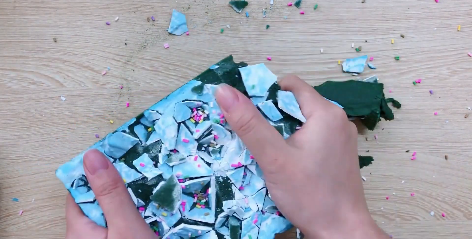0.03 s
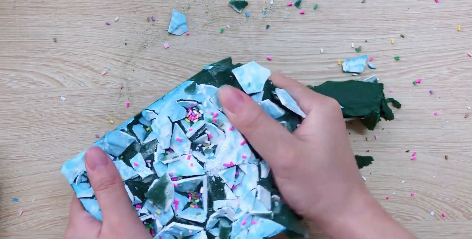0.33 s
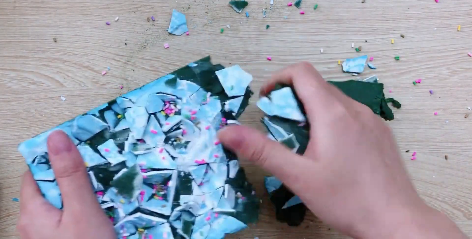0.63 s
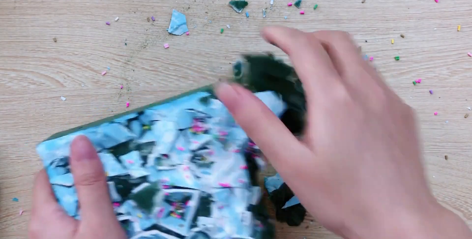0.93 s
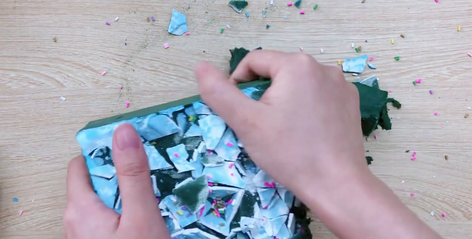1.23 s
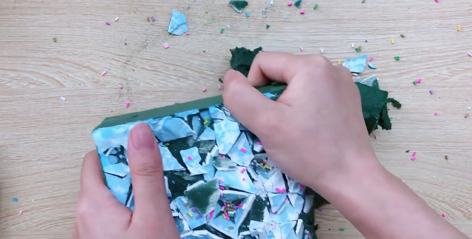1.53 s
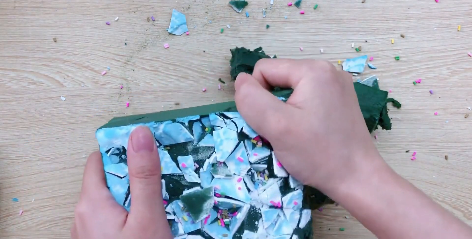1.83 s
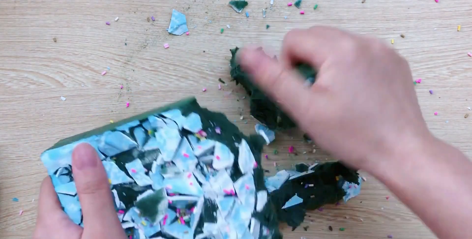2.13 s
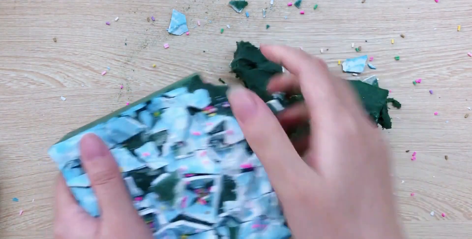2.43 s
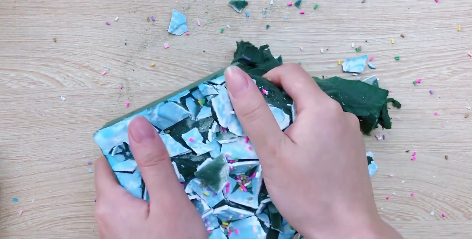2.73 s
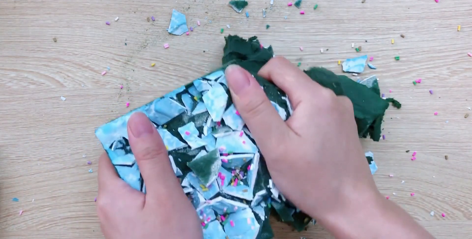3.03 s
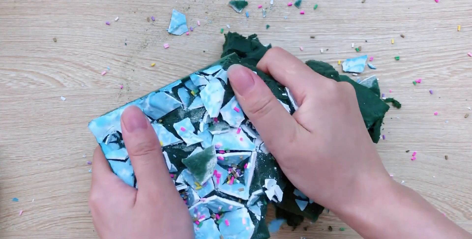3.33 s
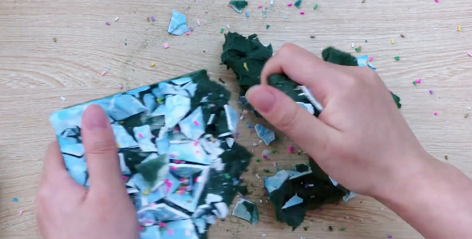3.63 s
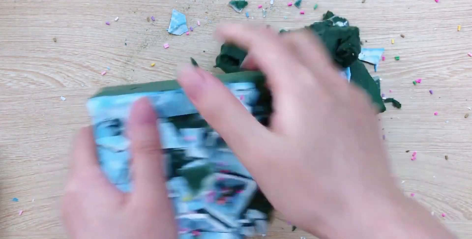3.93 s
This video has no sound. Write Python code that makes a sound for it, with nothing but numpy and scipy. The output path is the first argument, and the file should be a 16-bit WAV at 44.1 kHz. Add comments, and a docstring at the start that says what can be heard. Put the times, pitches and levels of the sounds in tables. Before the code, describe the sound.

Dry plaster-coated foam crunches and snaps up close as fingers tear it during the first 0.7 seconds. Shards and crumbs tap a wooden table around 1 second. A longer crackling squeeze runs from 1.2 to 1.8 seconds, followed by lighter crunches, pops and taps. Strong crunching and snapping returns from 2.7 to 3.7 seconds, then more bits fall. Soft handling rumble and a faint low hum lie underneath.

```python
"""Tearing plaster-coated foam

Close to the microphone, over a wooden table in a small room, fingers squeeze and tear chunks off a dry
block. Thousands of tiny cells collapse in each squeeze, the block gives way with dull pops and its
plaster crust snaps. Shards and crumbs tap on the table, over handling rumble and a low hum."""
import sys
import numpy as np
from scipy import signal
from scipy.fft import rfft, irfft
from scipy.io import wavfile
from scipy.ndimage import uniform_filter1d, map_coordinates

SR = 44100
rng = np.random.default_rng(int(sys.argv[2]) if len(sys.argv) > 2 else 0)


def unload_wav(signal):
    """Save mono or channel-first audio to the path in sys.argv[1] as 16-bit WAV at rate SR, clipped to [-1, 1]."""
    wavfile.write(
        sys.argv[1],
        SR,
        np.round(np.clip(np.atleast_2d(signal).T, -1, 1) * 32767).astype(np.int16),
    )


N = 176400
T = np.arange(N) / SR
MS, HIT_SAMPLES = SR / 1000, 2048  # samples in a millisecond and in one hit
HIT_MS = np.arange(HIT_SAMPLES) / MS
CELLS_PER_S, CELL_SPREAD_DB = 9000, 2.5
LEAD_DB = -18.5  # the strain before a snap or pop, relative to it

# Fingers squeeze the foam. Each row: time in seconds, relative levels of fizz and of crunch in dB.
SQUEEZES = [(0, -33, -34.5), (0.08, -25, -28.5), (0.2, -24.5, -29.5), (0.31, -24.5, -34),
            (0.425, -34.5, -48), (0.478, -24.5, -28.5), (0.53, -34, -42.5), (0.59, -38.5, -45),
            (0.68, -29.5, -36), (0.7, -45.5, -43.5), (0.81, -49, -48), (0.9, -37.5, -46),
            (1.05, -50, -45.5), (1.19, -55, -57), (1.205, -33, -35.5), (1.24, -45, -30.5), (1.28, -43, -38),
            (1.31, -32, -33.5), (1.39, -31.5, -39), (1.44, -26, -34), (1.52, -22, -37.5), (1.6, -26, -39.5),
            (1.66, -33, -42.5), (1.76, -33, -44.5), (1.805, -22.5, -33.5), (1.87, -48, -44.5),
            (1.96, -36.5, -45.5), (2.02, -40, -49.5), (2.085, -27.5, -37), (2.135, -46, -50),
            (2.18, -32, -47), (2.24, -49, -51.5), (2.35, -31.5, -41), (2.42, -36.5, -41), (2.48, -55, -55),
            (2.54, -48, -45.5), (2.635, -62, -50), (2.658, -38, -31.5), (2.69, -48, -41.5),
            (2.75, -36, -31.5), (2.89, -24, -31.5), (2.96, -31, -32.5), (3.015, -37.5, -38),
            (3.07, -28, -37.5), (3.2, -32.5, -40.5), (3.3, -46.5, -50), (3.345, -23.5, -37),
            (3.41, -34.5, -47.5), (3.47, -31, -43.5), (3.525, -49.5, -55.5), (3.57, -28.5, -34),
            (3.605, -31, -44), (3.64, -26, -36), (3.7, -45.5, -45.5), (3.78, -36, -44), (4.0, -44, -45)]
# The tone of surface fizz, grit, hollow crunch, handling rumble and room air.
# Each row: frequency in Hz, relative level in dB.
FIZZ_SPECTRUM = [(1500, -44), (2800, -42), (4200, -1.5), (6000, -2.5), (8000, 1.5), (10500, 0.5),
                 (13000, -4.5), (15500, -12.5)]
GRIT_SPECTRUM = [(800, -25), (1500, -4.5), (2100, -3), (3200, 10), (4200, 7.5), (6500, 4.5), (12000, -28)]
CRUNCH_SPECTRUM = [(120, -17.5), (400, -13.5), (620, -5.5), (1100, -0.5), (1750, 0), (2500, -4.5),
                   (4500, -17.5)]
RUMBLE_SPECTRUM = [(20, -15), (45, -1.5), (135, 8), (180, 0), (270, 3.5), (450, -2), (3000, -29)]
AIR_SPECTRUM = [(60, 12.5), (1000, 13), (15000, -68)]
# A low hum swells and sinks. Each row: time in seconds, level in dB that it wavers around.
HUM_LEVELS = [(0, -53.5), (1.25, -52), (1.42, -38.5), (1.66, -39.5), (1.88, -55.5), (2.12, -47),
              (2.53, -47), (4, -56)]
# Hands shift the block. Each row: time in seconds, relative level of the rumble in dB.
HANDLING_LEVELS = [(0, -43.5), (.44, -55.5), (.5, -43), (.9, -49.5), (.98, -39.5), (1.07, -44.5),
                   (1.13, -42.5), (1.27, -40.5), (1.95, -52.5), (2.45, -41), (3.05, -48.5), (3.75, -51),
                   (3.92, -42.5), (4, -45)]
# The block gives way or bumps the table. Each row: start in seconds, level in dB, pitch in Hz.
BLOCK_POPS = [(.0083, -9, 1250), (0.017, -17.5, 1280), (0.489, -7.5, 1075), (.604, -19.5, 860),
              (1.111, -12, 1100), (1.111, -16.5, 315), (1.2232, -12, 990), (2.2025, -24, 1540),
              (2.424, -14.5, 1060), (2.659, -19, 1270), (2.686, -26, 1700), (3.633, -23.5, 416)]
# The crust snaps. Each row: start in seconds, level in dB, centre of the crack in Hz,
# decay in milliseconds, level of the block's knock in dB.
CRUST_SNAPS = [(0.2025, -8.5, 4260, 0.81, -39), (0.2887, -14.5, 6500, 1.3, -14.5),
               (0.3374, -11.5, 8000, 2.1, -9), (0.342, -3.5, 6640, 2.7, -15),
               (0.3617, -8, 6800, 0.52, -18.5), (0.3854, -6.5, 4400, 1.6, -14.5),
               (1.022, -18.5, 4340, 2.8, -26), (1.1114, -19.5, 5250, 3.1, -31),
               (1.4098, -4.5, 8440, 9.6, -22), (1.4548, -8, 5140, 0.66, -12.5),
               (1.5006, -10.5, 4480, 1.3, -11), (1.6203, -12.5, 8850, 1.6, -24.5),
               (1.7066, -15, 6030, 1.5, -30), (1.7833, -3.5, 5330, 1.8, -11.5), (1.79, -10, 6000, 5.3, -16),
               (2.385, -12.5, 3850, 1.1, -38), (2.5032, -9, 2720, 0.68, -31),
               (2.5117, -7.5, 3500, 0.32, -21), (2.923, -11, 6800, 2.1, -30),
               (2.9325, -3.5, 3960, 0.91, -16.5), (3.1200, -14, 5960, 0.58, -22),
               (3.172, -16.5, 7000, 0.81, -25.5), (3.3540, -14, 7000, 2.2, -23.5),
               (3.3570, -5.5, 4940, 0.83, -17.5), (3.5505, -14.5, 3600, 0.37, -28),
               (3.6318, -2, 5500, 2.7, -13), (3.852, -19, 6800, 1.2, -28)]
# A chunk rips free. Each row: peak time in seconds, half-width in seconds, level in dB.
CHUNK_RIPS = [(0.457, 0.0027, -14), (.975, 0.0043, -25.5), (2.113, 0.0024, -27), (3.566, 0.0052, -17),
              (3.9, 0.0083, -27.5)]
# Shards land on the table. Each row: start in seconds, level in dB, pitch in Hz.
SHARD_TAPS = [(0.6706, -16.5, 2200), (.868, -20.5, 2130), (0.9356, -8, 2080), (0.94, -9.5, 2180),
              (1.0134, -20, 2130), (1.0225, -18, 2090), (1.0284, -22, 2180), (1.2231, -7, 2120),
              (1.3594, -13.5, 2510), (1.9233, -19.5, 2420), (2.2162, -22, 5070), (2.547, -19, 2130),
              (3.8518, -14.5, 2150), (3.8997, -13, 2150), (3.937, -25, 2150), (3.978, -23.5, 2150)]
# The short ring of a tap on the table.
# Each row: ratio to the tap's pitch, relative level in dB, decay in milliseconds.
TAP_RING = [(1, 32.5, 1.03), (1.03, -1, 11), (1.24, 16.5, 1.9)]
# Crumbs trickle on to the table. Each row: start in seconds, end in seconds, level in dB.
CRUMB_TRICKLES = [(0.943, 1.145, -41), (2.39, 2.554, -36.5), (3.85, 3.997, -36.5)]
# Hard squeezes make the block groan.
# Each row: peak time in seconds, half-width in seconds, level in dB, resonance in Hz.
BLOCK_GROANS = [(1.514, 0.096, -30.5, 1130), (2.863, 0.043, -29, 1000), (2.866, 0.04, -31, 1690)]


def amp(db):
    """Decibels to gain."""
    return 10 ** (np.asarray(db) / 20)


def unit(x):
    """Scale to rms 1."""
    return x / np.sqrt(np.mean(x ** 2))


def blow(x, db):
    """Give a short sound the energy of one millisecond at this level."""
    return x * amp(db) * np.sqrt(MS / np.sum(x ** 2))


def curve(rows, column=1):
    """Gain over time from a dB column of a table."""
    rows = np.array(rows)
    return amp(np.interp(T, rows[:, 0], rows[:, column]))


def swell(peak_s, half_width_s, db):
    """A brief rise and fall of level."""
    return amp(db) * np.exp(-2 * ((T - peak_s) / half_width_s) ** 2)


def colour(x, spectrum):
    """Causal filter with the given (Hz, dB) shape; output at rms 1."""
    hz, db = np.array(spectrum).T
    shape_db = np.interp(np.log(np.fft.rfftfreq(N, 1 / SR) + 1), np.log(hz), db)
    cepstrum = irfft(np.log(amp(shape_db)), N)
    cepstrum[1:N // 2] *= 2  # minimum phase: nothing rings ahead of a click
    cepstrum[N // 2 + 1:] = 0
    return unit(irfft(rfft(x) * np.exp(rfft(cepstrum)), N))


def wander(rate_hz):
    """Smooth random drift at rms 1."""
    hold = max(int(SR / rate_hz), 1)
    steps = np.repeat(rng.standard_normal(N // hold + 1), hold)
    return unit(uniform_filter1d(steps, hold)[:N])


def clicks(per_s, spread_db):
    """Random clicks: many small ones and a few large."""
    fires = rng.random(N) < per_s / SR
    size = np.minimum(rng.exponential(size=N), 6)
    return fires * rng.choice([-1, 1], N) * amp(spread_db * size)


def ring(hz, decay_ms, rise_ms=0.19):
    """The velocity of one damped mode, set off by a soft contact."""
    envelope = np.exp(-HIT_MS / decay_ms) * (1 - np.exp(-HIT_MS / rise_ms))
    swing = np.sin(2 * np.pi * hz * HIT_MS / 1000) * envelope
    return np.diff(swing, prepend=0) * SR / (2 * np.pi * hz)


def resonate(x, hz, decay_ms):
    """Pass a sound through one mode; output at rms 1."""
    return unit(signal.fftconvolve(x, ring(hz, decay_ms))[:N])


def fracture(hz, octaves, decay_ms, top_hz=11200):
    """A running crack: a fast-dying rattle of micro-fractures in a broad band."""
    f = np.fft.rfftfreq(HIT_SAMPLES, 1 / SR) + 1
    band = np.exp(-.5 * (np.log2(f / hz) / octaves) ** 2) / np.sqrt(1 + (f / top_hz) ** 8)
    rattle = irfft(band * np.exp(2j * np.pi * rng.random(len(f))))
    attack = 1 - np.exp(-HIT_MS / 1000 * hz)
    return rattle * attack * np.exp(-HIT_MS / decay_ms)


def add(out, start_s, x):
    """Mix a short sound in at its start time."""
    i = int(start_s * SR)
    x, i = x[max(-i, 0):], max(i, 0)
    out[i:i + len(x)] += x[:max(N - i, 0)]


def foam():
    """Cells collapse in uneven avalanches: fizz at the surface, hollow crunch inside, grit between."""
    bright, hollow = curve(SQUEEZES, column=1), curve(SQUEEZES, column=2)
    walls = amp(-10.5) * unit(clicks(per_s=350, spread_db=5))  # coarser clicks common to all layers
    cells = lambda: unit(clicks(CELLS_PER_S, CELL_SPREAD_DB)) + walls
    fizz = amp(-2) * bright * colour(cells(), FIZZ_SPECTRUM)
    grit = amp(-1.5 + 2 * wander(24.5)) * np.sqrt(bright * hollow) * colour(cells(), GRIT_SPECTRUM)
    crunch = amp(1.5) * hollow * colour(cells(), CRUNCH_SPECTRUM)
    groans = sum(swell(s, half_width_s, db) * resonate(cells(), hz, decay_ms=0.88)
                 for s, half_width_s, db, hz in BLOCK_GROANS)
    fingertip_scrape = swell(2.088, 0.04, db=-32) * resonate(cells(), hz=3150, decay_ms=0.19)
    flutter = amp(2.16 * wander(160))
    return (fizz + grit + crunch + groans + fingertip_scrape) * flutter


def near_reflections(x):
    """Table and hands bounce the sound to the microphone; the paths shift as the block moves."""
    echoes, power = np.zeros(N), 1
    for delay_ms, db in [(0.848, -14.5), (2.598, -24.5)]:
        lag = delay_ms * MS * (1 + 0.1 * wander(5.5))
        echoes += amp(db) * map_coordinates(x, [np.arange(N) - lag], order=3)
        power += amp(db) ** 2
    return (x + echoes) / np.sqrt(power)


def hum(hz=64.7):
    """A low hum in the background, wavering in pitch and level, with a faint octave."""
    phase = 2 * np.pi * np.cumsum(hz * (1 + 0.036 * wander(8.2))) / SR
    fundamental = curve(HUM_LEVELS) * amp(3.5 * wander(8.1)) * np.sin(phase)
    octave = amp(-59.5 + wander(26)) * np.sin(2 * phase)
    return np.sqrt(2) * (fundamental + octave)


def handling():
    """The block rumbles as the hands shift it."""
    return amp(1) * curve(HANDLING_LEVELS) * colour(clicks(per_s=900, spread_db=2.93), RUMBLE_SPECTRUM)


def room_air():
    """The faint, steady noise of a still room."""
    return amp(-60.5) * colour(rng.standard_normal(N), AIR_SPECTRUM)


def block_pops():
    """Dull, heavily damped pops of the foam body, each after a brief strain."""
    out = np.zeros(N)
    for s, db, hz in BLOCK_POPS:
        crunch, strain = (fracture(hz, octaves=1, decay_ms=1.8) for _ in range(2))
        pop = blow(ring(hz, decay_ms=0.94), 0) + blow(crunch, -0.43)
        add(out, s, blow(pop, db))
        add(out, s - HIT_SAMPLES / SR, blow(strain, db + LEAD_DB)[::-1])  # swells into the pop
    return out


def dispersed(x, bass_lag_s=0.0018, corner_hz=1455):
    """Bending waves carry the treble fastest, so each hit arrives as a very short downward chirp."""
    f = np.fft.rfftfreq(N, 1 / SR)
    delay_s = bass_lag_s / (1 + (f / corner_hz) ** 2)
    phase = 2 * np.pi * np.cumsum(delay_s) * SR / N
    return irfft(rfft(x) * np.exp(-1j * phase), N)


def crust_snaps():
    """Each snap creaks in, cracks brightly and knocks the block under it; one thin flake pings."""
    out = np.zeros(N)
    for s, db, hz, decay_ms, knock_db in CRUST_SNAPS:
        knock_hz = 1200 * np.exp(.12 * rng.standard_normal())
        thud = fracture(750, octaves=0.94, decay_ms=6.3)
        knock = blow(ring(knock_hz, decay_ms=0.8), 0) + blow(thud, -4.5)
        crack, creak = (fracture(hz, octaves=0.92, decay_ms=decay_ms) for _ in range(2))
        add(out, s, blow(crack, db) + blow(knock, knock_db))
        add(out, s - HIT_SAMPLES / SR, blow(creak, db + LEAD_DB)[::-1])
    ping = ring(11600, decay_ms=7.8) + ring(12900, decay_ms=7.8)
    add(out, 2.5125, blow(ping, -20))
    return out


def chunk_rips():
    """Brief, bright sprays of fizz as the foam tears."""
    sprays = [colour(clicks(CELLS_PER_S, CELL_SPREAD_DB), FIZZ_SPECTRUM) for _ in range(2)]
    return sum(swell(*rip) for rip in CHUNK_RIPS) * np.array(sprays)


def tap_ring(hz):
    """The short ring of a tap on the table."""
    return sum(amp(db) * ring(hz * ratio, decay_ms) for ratio, db, decay_ms in TAP_RING)


def shard_taps():
    """Single shards land on the table, each tap a click and a short ring."""
    out = np.zeros(N)
    for s, db, hz in SHARD_TAPS:
        click = fracture(2000, octaves=2.3, decay_ms=3.8)
        add(out, s, blow(tap_ring(hz), db) + blow(click, db - 13.5))
    return out


def crumbs():
    """Fine crumbs trickle on to the table in short runs of tiny taps."""
    flow = sum(amp(db) * uniform_filter1d(1. * ((T > start) & (T < end)), size=1500)
               for start, end, db in CRUMB_TRICKLES)
    patter = signal.fftconvolve(clicks(per_s=220, spread_db=2.2), tap_ring(hz=2090))[:N]
    return flow * unit(patter)


def scene(room_t60_s=0.29):
    """The block is close and central; behind it, a trace of a small room."""
    squeezes = near_reflections(foam())
    hits = dispersed(crust_snaps() + block_pops() + shard_taps() + crumbs())
    near = squeezes + hits + chunk_rips()
    tail = colour(rng.standard_normal(N), [(200, 5), (12000, -7)])
    tail *= amp(-60 * T / room_t60_s) * (T > .004)
    room = signal.fftconvolve(near.mean(axis=0), tail / np.sqrt(np.sum(tail ** 2)))[:N]
    return near + amp(-17) * room + hum() + handling() + room_air()


def record(dry, top_hz=15700):
    """This close to the microphone the loudest snaps hit full scale; the top treble is cut."""
    lowpass = signal.ellip(10, .2, 80, top_hz, fs=SR, output="sos")
    return signal.sosfilt(lowpass, np.clip(dry, -1, 1))


dry = scene()
out = record(dry)
unload_wav(out)
```